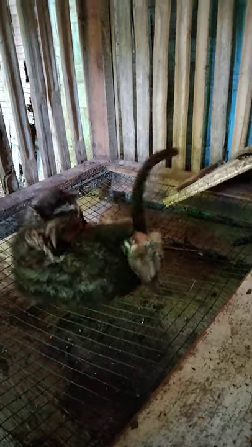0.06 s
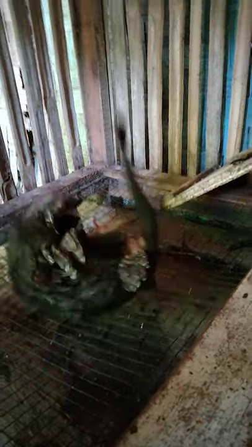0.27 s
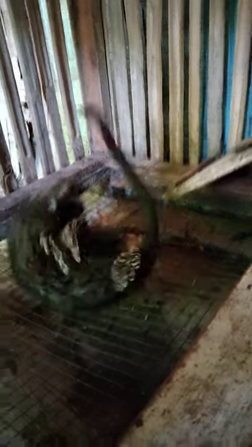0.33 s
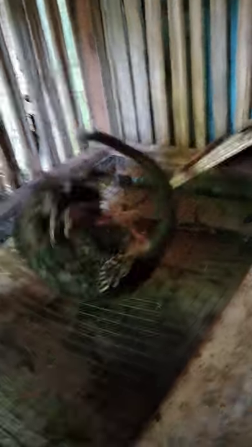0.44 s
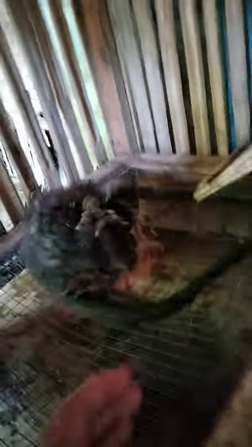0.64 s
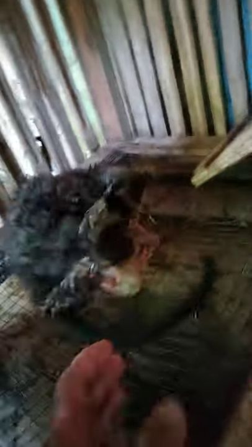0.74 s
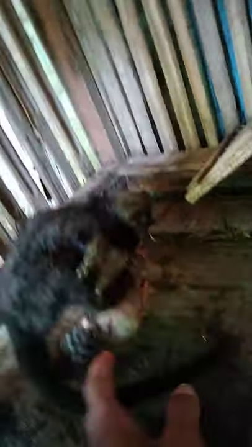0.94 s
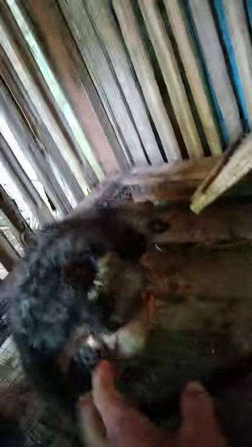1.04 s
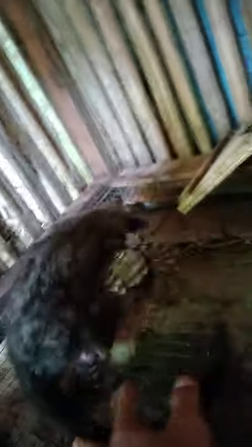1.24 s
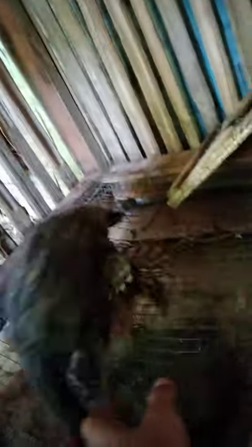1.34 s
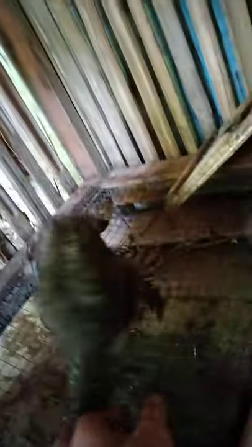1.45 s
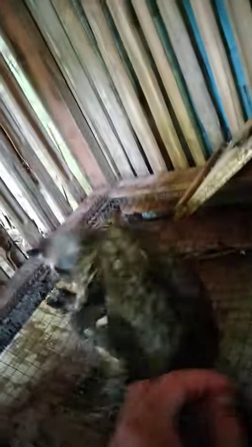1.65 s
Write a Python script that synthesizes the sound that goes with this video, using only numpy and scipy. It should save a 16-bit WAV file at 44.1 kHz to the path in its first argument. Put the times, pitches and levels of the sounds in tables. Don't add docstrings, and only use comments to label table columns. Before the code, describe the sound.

One high, loud animal cry begins rough and doubled, slides down and stops abruptly; soft paw bumps and gritty scuffs follow, then harder wooden knocks and small wire pings, heard close in a slatted outdoor cage.

```python
import sys
import numpy as np
from scipy import signal
from scipy.fft import rfft, irfft
from scipy.io import wavfile
from scipy.ndimage import uniform_filter1d

SR = 44100
rng = np.random.default_rng(int(sys.argv[2]) if len(sys.argv) > 2 else 0)


def digitize_waveform(pressure):
    field = np.atleast_2d(pressure).T
    bounded = np.clip(field, -1, 1)
    quanta = np.round(bounded * 32767).astype(np.int16)
    wavfile.write(sys.argv[1], SR, quanta)


def natural_amplitude(level_db):
    exponent = np.asarray(level_db, float) / 20
    return 10 ** exponent


N = 74970
TOP_HZ = 15650


def unit(x):
    return x / np.sqrt(np.mean(x ** 2))


def read(table, t, column=1):
    points = np.array(table)
    return np.interp(t, points[:, 0], points[:, column])


def band(x, hz, width):
    return signal.lfilter(*signal.iirpeak(hz, hz / width, fs=SR), x)


def colour(x, table):
    hz, db = np.array(table).T
    f = np.maximum(np.arange(N // 2 + 1) * SR / N, 1)
    return irfft(rfft(x) * natural_amplitude(np.interp(np.log(f), np.log(hz), db)), N)


def walk(rate):
    k = int(SR / rate)
    return unit(uniform_filter1d(uniform_filter1d(rng.standard_normal(N), k), k))


def phase_of(hz):
    return 2 * np.pi * np.cumsum(hz) / SR


def soft_switch(t, at, length):
    return 0.5 + 0.5 * np.tanh((t - at) / length)


def contacts(size):
    chance, luck = rng.random((size, 2)).T
    grains_per_s, spread_db = 10000, 2.0
    hits = (chance < grains_per_s / SR) * natural_amplitude(-spread_db * np.log(1 - luck))
    return unit(hits * rng.standard_normal(size))


WOBBLE, SHIMMER_DB = 0.0011, 1.17
CRACK_S = 0.4065


def cry(t):
    low_hz, low_db = lower_path(t)
    up_hz, up_db, paired = upper_path(t)
    low, up = phase_of(low_hz), phase_of(up_hz)
    out = natural_amplitude(low_db) * (lower_tone(t, low) + overtones(t, low_hz, low))
    out = out + natural_amplitude(up_db) * np.sin(up) * paired
    out = out + mixed_tones(t, up_hz, up_db, up, low_hz, low_db, low) * paired
    return np.sqrt(2) * out


# (t/s, f/Hz, level/dB)
LOWER_PAIRED = [(0, 4515, -54.5), (.032, 4520, -55.5), (0.064, 4498, -45), (0.115, 4664, -42),
                (.14, 4494, -41.5), (0.175, 4585, -41), (0.191, 4510, -37.5), (0.201, 4446, -33.5),
                (.212, 4165, -28)]
# (t/s, f/Hz)
FALL_PITCH = [(0.231, 3926), (0.267, 3814), (0.284, 3655), (0.308, 3693), (0.34, 3560), (.36, 3407),
              (.382, 2770), (0.399, 2380), (.401, 2002)]
# (t/s, level/dB)
FALL_LEVEL = [
    (.228, -19),
    (.262, -19.5),
    (.276, -17),
    (0.29, -23),
    (0.324, -18.5),
    (0.341, -25.5),
    (0.353, -20),
    (0.381, -35),
    (0.405, -32),
    (0.411, -46.5),
]


def lower_path(t):
    paired_s, paired_hz, paired_db = np.array(LOWER_PAIRED).T
    hz = read(list(zip(paired_s, paired_hz)) + FALL_PITCH, t) * (1 + WOBBLE * walk(140))
    hz = hz * (1 + 0.035 * walk(220) * (t > CRACK_S))
    db = read(list(zip(paired_s, paired_db)) + FALL_LEVEL, t) + SHIMMER_DB * walk(150)
    return hz, db - 3000 * np.maximum(t - FALL_LEVEL[-1][0], 0)


# (t/s, f/Hz, level/dB)
UPPER = [(0, 4955, -43.5), (.024, 4920, -46), (.066, 4940, -47), (.108, 4985, -39.5), (.124, 5050, -42.5),
         (.166, 4987, -40), (.19, 4915, -37), (.205, 4714, -33.5), (.214, 4600, -63)]


def upper_path(t):
    hz = read(UPPER, t) * (1 + WOBBLE * walk(120))
    db = read(UPPER, t, column=2) + SHIMMER_DB * walk(150)
    return hz, db, t < UPPER[-1][0]


# (t/s, half width/s)
NULLS = [
    (0.2695, 0.0021),
    (.341, 0.022),
    (0.384, 0.0018),
]


def lower_tone(t, low):
    rasp = natural_amplitude(-48.5) + natural_amplitude(-6) * soft_switch(t, CRACK_S, 0.0054)
    tone = np.sin(low) + rasp * (walk(1200) * np.sin(low) + walk(1200) * np.cos(low))
    for at, width in NULLS:
        tone = tone * np.tanh((t - at) / width)
    return tone


# (f/Hz, level/dB)
THROAT = [(3500, 1.5), (5350, -1), (6000, -4.5), (8500, -5), (10400, 6), (11300, -4), (14600, -1.5),
          (15200, -19)]
MULTIPLES = [2, 3, 4]
# (level/dB while paired, level/dB alone)
OVERTONES = [(-11, -19.5), (-32.5, -40), (-47.5, -35.5)]


def overtones(t, low_hz, low):
    alone = soft_switch(t, 0.22, 0.023)
    shut_db = -0.009 * np.maximum(3620 - low_hz, 0)
    out = 0
    for k, (paired_db, alone_db) in zip(MULTIPLES, OVERTONES):
        db = paired_db + (alone_db - paired_db) * alone + (k - 1) * shut_db
        db = db + read(THROAT, k * low_hz) + 3.7 * walk(130)
        out = out + natural_amplitude(db) * np.sin(k * low + 0.4 * walk(400)) * (k * low_hz < TOP_HZ)
    return out


MIXES = [(2, -1), (3, -2), (-1, 2), (-2, 3), (2, 0), (1, 1), (3, -1), (4, -2), (-1, 3), (3, 0), (2, 1),
         (1, 2), (4, -1), (-1, 4)]
MIX_DB = [-10.5, -17.5, -17, -29.5, -15, -18, -18, -24.5, -24, -29.5, -23, -25, -38, -29]


def mixed_tones(t, up_hz, up_db, up, low_hz, low_db, low):
    out = 0
    for (m, n), mix_db in zip(MIXES, MIX_DB):
        both_db = (abs(m) * up_db + abs(n) * np.minimum(low_db, -36)) / (abs(m) + abs(n))
        db = both_db + mix_db + read(THROAT, m * up_hz + n * low_hz) + 2.5 * walk(90)
        db = db + 34 * t * min(n, 0)
        out = out + natural_amplitude(db) * np.sin(m * up + n * low + 0.57 * walk(300))
    return out


def boards(x, body, shift):
    x = signal.lfilter(*signal.butter(2, 4500, fs=SR), x)
    return sum(natural_amplitude(db) * band(x, hz * k, width) for (hz, width, db), k in zip(body, shift))


WOOD_DB, GRIT_DB = 12, 21.5
# (t/s, peak level/dB, rise/s, fade by 60 dB/s, grit
# level/dB)
FLOOR_BUMPS = [(0.001, -40, 0.0099, 0.083, -19.5), (0.039, -55, 0.0073, 0.23, -17),
               (0.088, -56.5, 0.0059, 0.19, -9), (0.144, -48.5, 0.0075, 0.092, -10),
               (0.188, -39.5, 0.0028, 0.14, -18), (0.224, -44.5, 0.008, 0.12, -10.5),
               (0.242, -42, 0.0072, 0.085, -17.5), (0.261, -40, 0.009, 0.1, -16.5),
               (0.277, -52.5, 0.0088, 0.13, -19.5), (0.309, -52, 0.008, 0.18, -23.5),
               (0.359, -54, 0.008, 0.4, -3),
               (0.476, -61.5, 0.0073, 0.093, -4.5), (0.567, -57, 0.014, 0.16, -29),
        (0.598, -45.5, 0.008, 0.13, -10), (0.617, -51.5, 0.0097, 0.18, -16),
        (0.629, -42.5, 0.011, 0.17, -7.5), (0.682, -59, 0.01, 0.41, -46), (0.709, -55.5, 0.0096, 0.12, -27),
        (0.765, -56.5, 0.008, 0.15, -12), (0.871, -49, 0.0072, 0.17, -20.5),
        (0.886, -44, 0.012, 0.19, -17.5), (0.95, -56, 0.0052, 0.2, -1.5), (1.062, -37, 0.014, 0.12, -14.5),
        (1.099, -54.5, 0.022, 0.32, -7.5), (1.129, -48.5, 0.01, 0.09, -16), (1.147, -63, 0.0055, 0.08, 5.5)]
LAST = [(1.206, -32, 0.0027, 0.12, -26), (1.257, -33.5, 0.0088, 0.09, -23), (1.291, -44, 0.0054, 0.24, -23),
        (1.31, -43.5, 0.0087, 0.096, -28), (1.321, -37, 0.005, 0.063, -16),
        (1.355, -40.5, 0.0062, 0.053, -14.5), (1.408, -40, 0.0083, 0.056, -9.5),
        (1.431, -42.5, 0.0044, 0.083, -19), (1.465, -53, 0.013, 0.15, -7), (1.518, -60.5, 0.0032, 0.032, 4),
        (1.5454, -31.5, 0.0019, 0.11, -16), (1.6, -46, 0.0046, 0.16, -10.5),
        (1.651, -47.5, 0.0056, 0.1, -8.5), (1.667, -48, 0.0086, 0.14, -33)]
# (f/Hz, width/Hz, level/dB)
BOARDS = [(151, 110, -3.5), (465, 380, -7), (717, 257, -7), (1050, 510, -12.5), (1300, 180, -2),
          (3200, 350, -9), (4630, 440, -28.5)]
# (f/Hz, width/Hz, level/dB)
SLATS = [(462, 90, -6), (704, 140, -3.5), (1077, 120, -2.5), (1430, 174, 1.5), (1649, 143, -2.5),
         (3200, 670, -16.5), (3840, 88, -36)]
# (f/Hz, level/dB per Hz)
GRIT = [(300, -14.5), (1500, -3), (4000, -11), (6000, -13.5), (7700, -7), (9500, -19.5), (12500, -21.5),
        (15500, -16)]


def bumps(t):
    size = SR // 4
    u = t[:size]
    knock, scratch = contacts(N + size), contacts(N + size)
    wood, grit = np.zeros(N + size), np.zeros(N + size)
    moves = [(row, BOARDS, 0.069) for row in FLOOR_BUMPS] + [(row, SLATS, 0.024) for row in LAST]
    for (at, db, rise, t60, grit_db), body, spread in moves:
        rise, t60 = max(rise, 0.001), max(t60, 0.02)
        start = int(at * SR)
        here = slice(start, start + size)
        push = natural_amplitude(db - 8) * np.minimum(u / rise, 1) * natural_amplitude(-60 * np.maximum(u - rise, 0) / t60)
        shift = 1 + spread * rng.standard_normal(len(body))
        wood[here] += boards(push * knock[here], body, shift)
        grit[here] += natural_amplitude(grit_db) * push * natural_amplitude(-40 * u / t60) * scratch[here]
    return natural_amplitude(WOOD_DB) * wood[:N] + natural_amplitude(GRIT_DB) * colour(grit[:N], GRIT)


# (t/s, level/dB)
SHUFFLE = [(0.0, -60.5), (0.07, -69), (0.198, -59), (0.274, -56), (0.392, -68), (0.714, -70), (0.786, -72),
           (.82, -75), (.86, -82.5), (0.898, -68), (0.99, -74.5), (1.04, -83), (1.168, -70), (1.258, -63),
           (1.7, -62)]


def shuffle(t):
    drag = natural_amplitude(read(SHUFFLE, t) + 2.1 * walk(31))
    wood = boards(drag * contacts(N), BOARDS, np.ones(len(BOARDS)))
    grit = colour(natural_amplitude(-15.5) * drag * contacts(N), GRIT)
    thud = natural_amplitude(-4.5) * drag * unit(band(rng.standard_normal(N), 132, 119.5))
    return natural_amplitude(WOOD_DB) * wood + natural_amplitude(GRIT_DB) * grit + thud


def blows(t, table, rise):
    out = 0
    for at, hz, db in table:
        u = np.maximum(t - at, 0)
        swell = np.e * u / rise * np.exp(-u / rise)
        out = out + natural_amplitude(db) * swell * np.sin(2 * np.pi * hz * u * (1 + 0.01 * walk(230)))
    return out


# (t/s, f/Hz, level/dB)
KNOCKS = [(.602, 1300, -66), (1.15, 475, -49.5), (1.272, 720, -46.5), (.874, 1250, -59), (1.065, 1485, -64),
          (1.2039, 1456, -46), (1.265, 1476, -36), (1.322, 1620, -60), (1.358, 1750, -39.5),
          (1.411, 1500, -45), (1.4318, 1464, -51.5), (1.5465, 1540, -45), (1.547, 780, -49.5),
          (1.61, 1400, -46.5)]


def knocks(t):
    return blows(t, KNOCKS, rise=0.0019)


# (t/s, f/Hz, level/dB)
THUMPS = [
    (0.251, 155, -56.5),
    (0.674, 191.5, -57),
    (0.969, 172.6, -62.5),
    (1.216, 177, -62.5),
    (1.31, 87, -76),
    (1.556, 97, -52),
]


def thumps(t):
    return blows(t, THUMPS, rise=0.005)


# (t/s, f/Hz, level/dB)
CLAWS = [(1.2, 7013, -60), (1.1, 4960, -59.5), (1.137, 4020, -60), (1.074, 3200, -43), (1.136, 6650, -55.5),
         (1.205, 4200, -42), (1.545, 7500, -52), (0.262, 6000, -48), (.264, 9500, -53), (0.242, 10300, -60),
         (.715, 3600, -62), (.9, 3200, -58), (1.325, 4000, -45), (1.468, 2600, -53), (1.52, 7800, -58),
         (1.61, 7640, -59)]


def claws(t):
    scratch, out = contacts(N), 0
    for at, hz, db in CLAWS:
        fade = (t > at) * natural_amplitude(-60 * np.maximum(t - at, 0) / 0.032)
        out = out + natural_amplitude(db + 13) * band(scratch * fade, hz, 0.096 * hz)
    return out


def high_hiss(t):
    start_s, hz, width_hz = 1.065, 15070, 1500
    hiss = band(band(contacts(N), hz, width_hz), hz, width_hz)
    return natural_amplitude(-79.5 + 4 * walk(25)) * unit(hiss) * (t > start_s)


CRICKET_HZ = [5040, 5225]
# (pitch wobble as a fraction, level/dB, throbs per s)
CRICKETS = [(0.0044, -81, 70), (0.0013, -79.5, 36)]


def crickets(t):
    swell_db = 0 * np.exp(-((t - 0.54) / 0.096) ** 2)
    out = 0
    for hz, (wobble, db, rate) in zip(CRICKET_HZ, CRICKETS):
        throb = 0.6 + 0.34 * np.sin(2 * np.pi * rate * t + 2.3 * walk(7.3))
        tone = np.sin(phase_of(hz * (1 + wobble * walk(60))))
        out = out + natural_amplitude(db + 5.5 + 1.5 * walk(8) + swell_db) * throb * tone
    return out


# (f/Hz, level/dB per Hz)
AIR = [(30, -28.5), (90, 0.5), (300, -10), (1500, -29), (2500, -38.5), (8000, -35), (11800, -39.5),
       (16000, -35.5)]


def outdoor_hum():
    return natural_amplitude(-68 + 0.51 * walk(2.6)) * unit(colour(rng.standard_normal(N), AIR))


def cage_echo(near):
    u = np.arange(SR // 2) / SR
    tail = rng.standard_normal(len(u)) * natural_amplitude(-60 * u / 0.15)
    tail = tail * (u > 0.0084)
    tail = signal.lfilter(*signal.butter(1, 5900, fs=SR), tail)
    return natural_amplitude(-18) * signal.fftconvolve(near, tail / np.sqrt(np.sum(tail ** 2)))[:N]


# (delay t/s, level/dB)
WALL_ECHOES = [
    (.0095, -25),
    (.0198, -16),
]


def scene():
    t = np.arange(N) / SR
    near = cry(t) + bumps(t) + shuffle(t) + knocks(t) + thumps(t) + claws(t) + high_hiss(t)
    near = near + sum(natural_amplitude(db) * np.pad(near, (int(lag * SR), 0))[:N] for lag, db in WALL_ECHOES)
    return (near + cage_echo(near) + crickets(t) + outdoor_hum())[None]


def low_pass(x):
    return signal.sosfilt(signal.butter(12, 16380, fs=SR, output="sos"), x)


def record(dry):
    mix = signal.sosfilt(signal.butter(3, 87.4, "high", fs=SR, output="sos"), dry)
    mix = signal.sosfilt(signal.ellip(8, 0.2, 70, TOP_HZ, fs=SR, output="sos"), mix)
    return low_pass(mix)


dry = scene()
out = record(dry)
digitize_waveform(out)
```